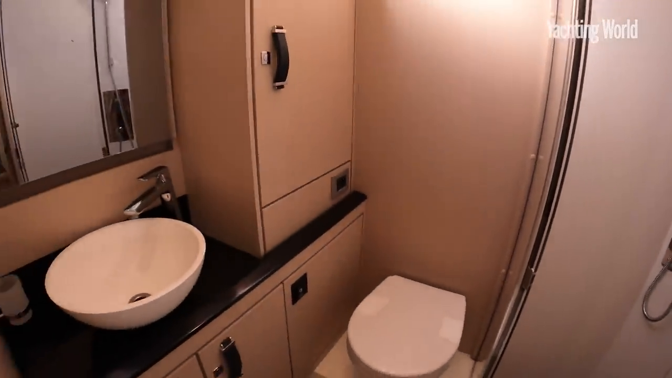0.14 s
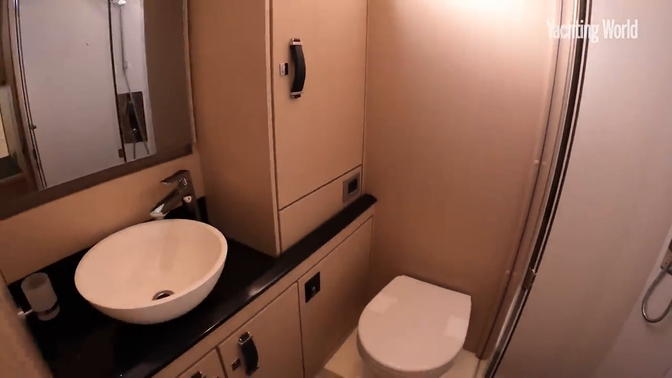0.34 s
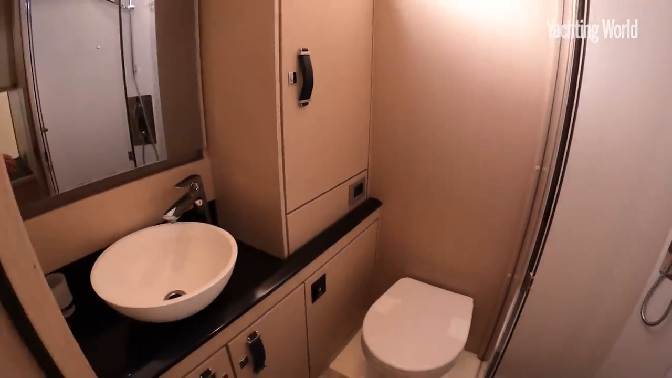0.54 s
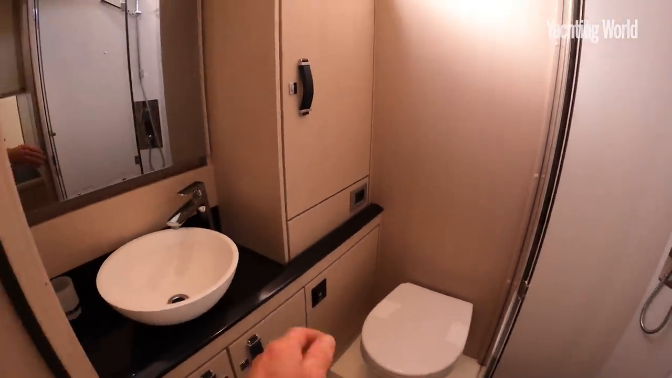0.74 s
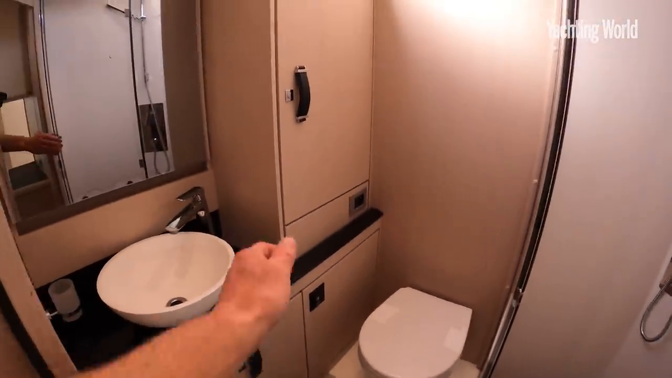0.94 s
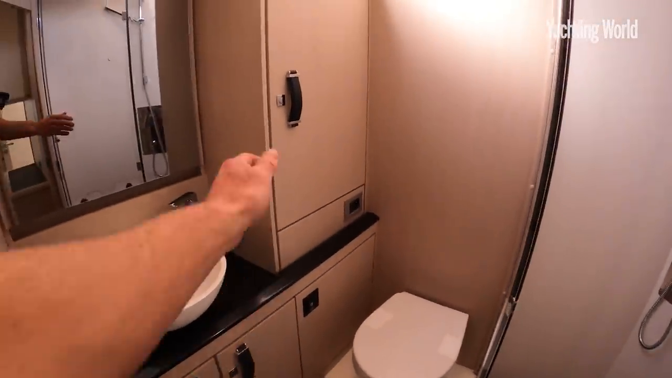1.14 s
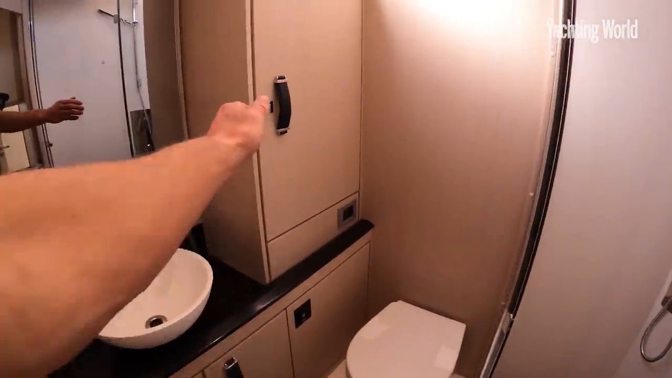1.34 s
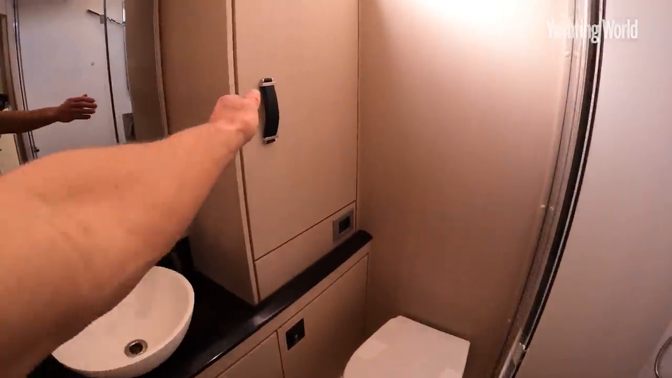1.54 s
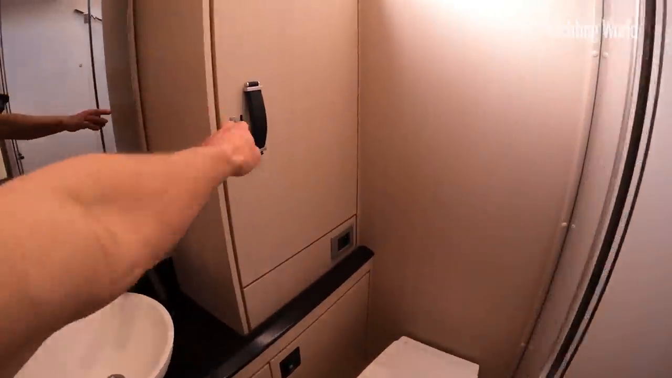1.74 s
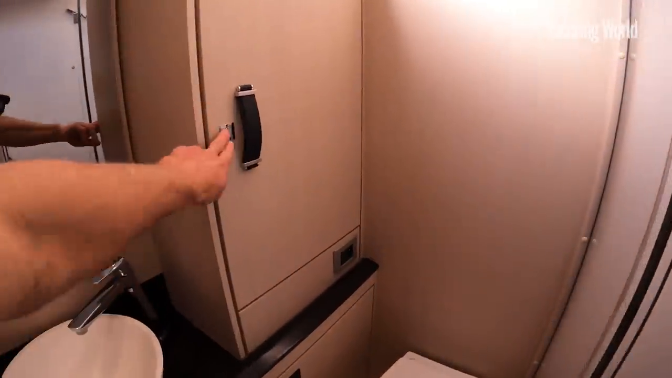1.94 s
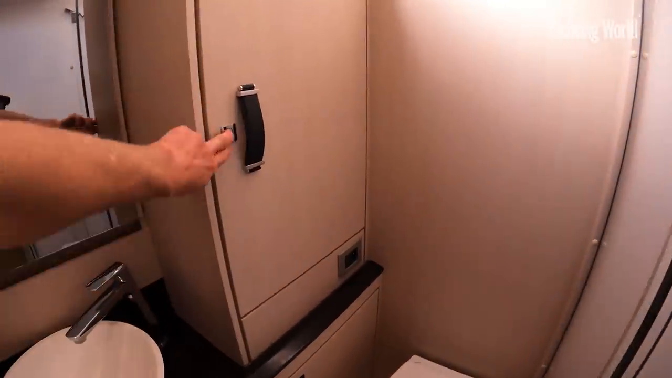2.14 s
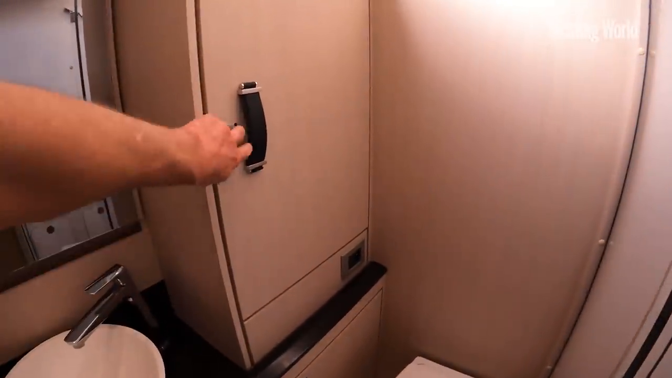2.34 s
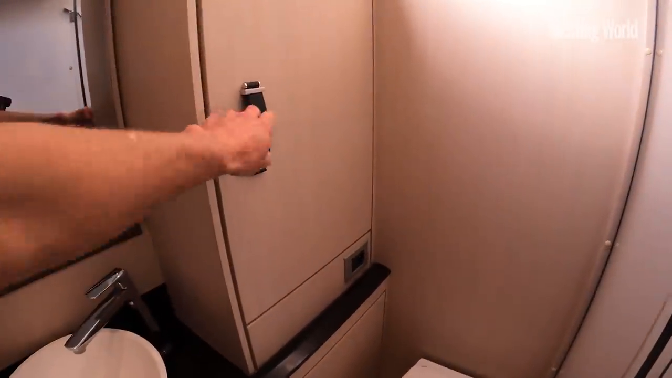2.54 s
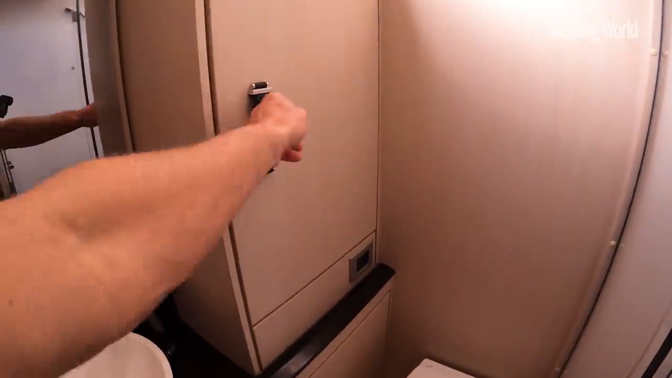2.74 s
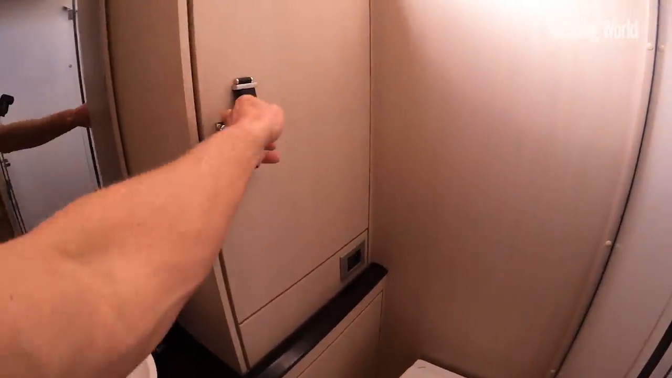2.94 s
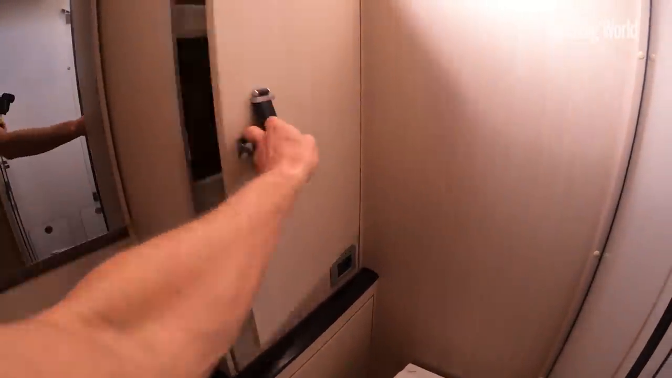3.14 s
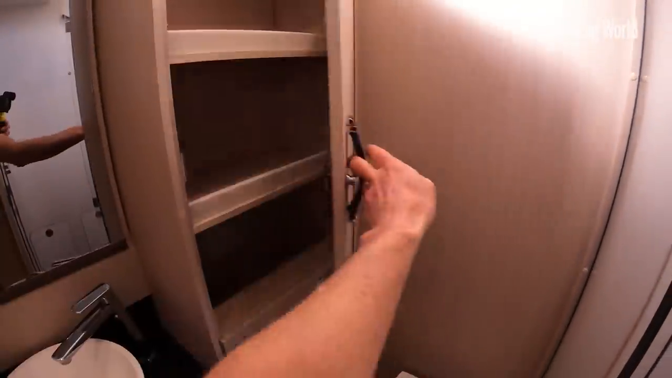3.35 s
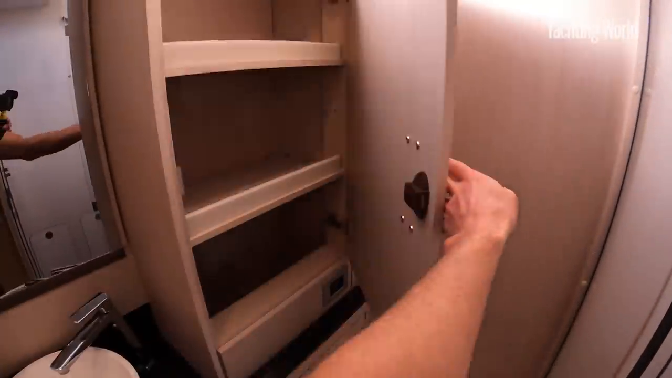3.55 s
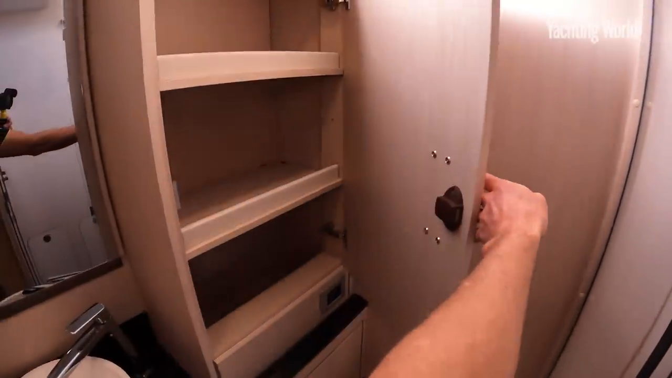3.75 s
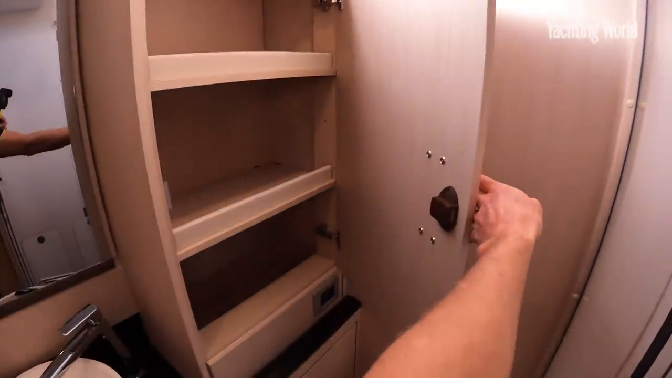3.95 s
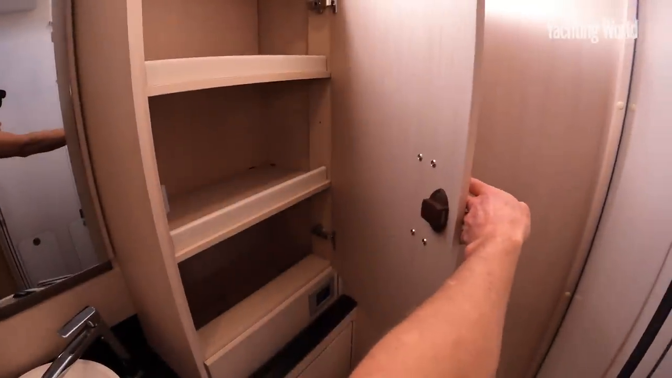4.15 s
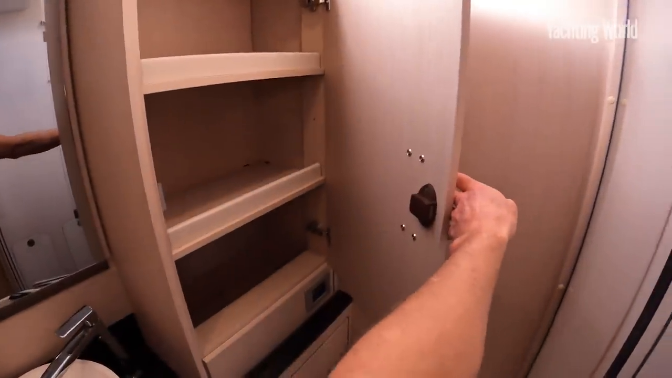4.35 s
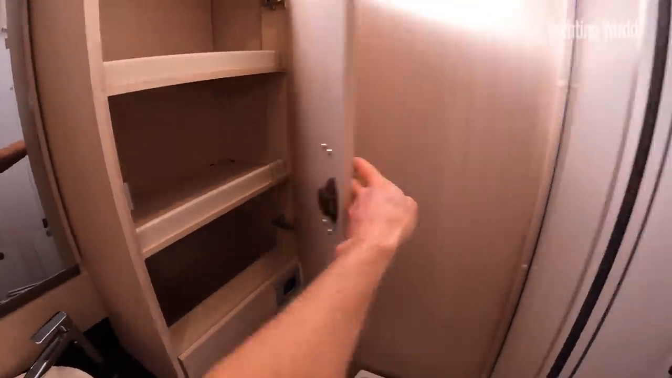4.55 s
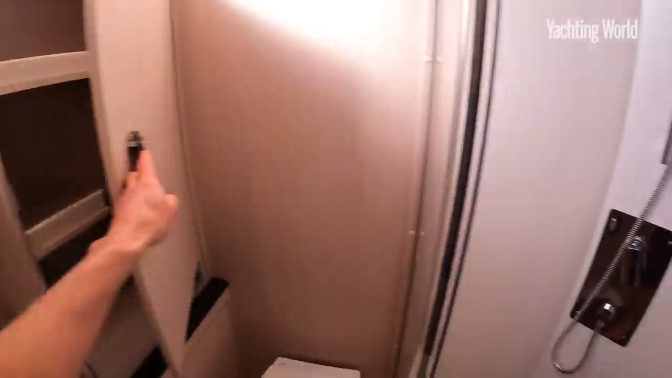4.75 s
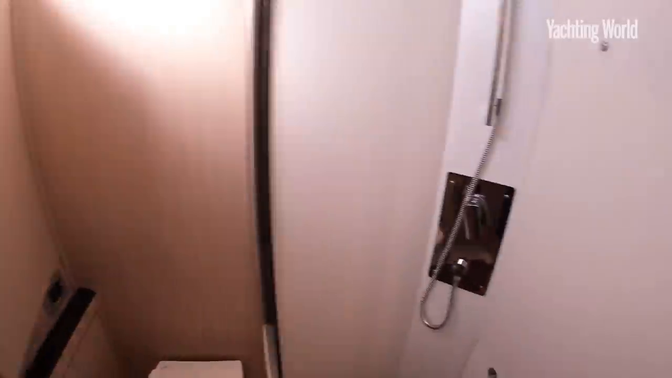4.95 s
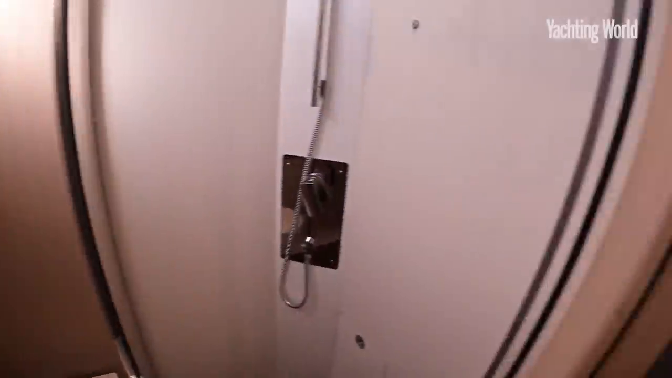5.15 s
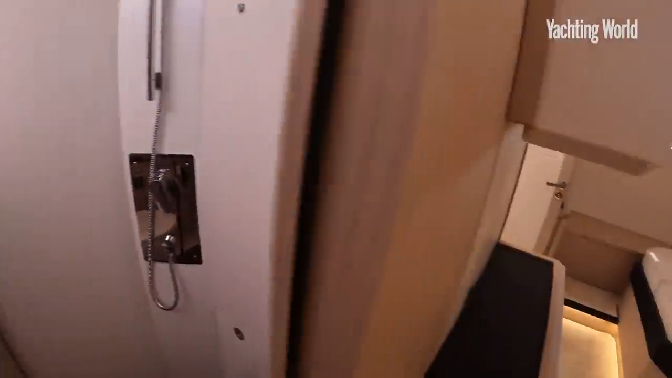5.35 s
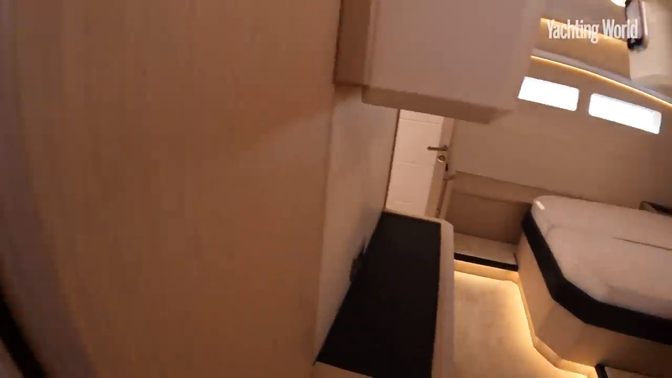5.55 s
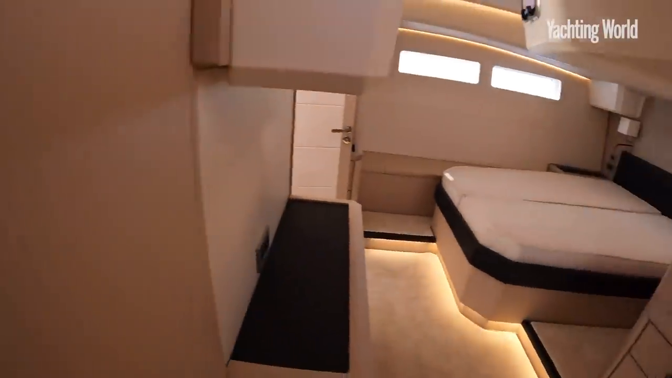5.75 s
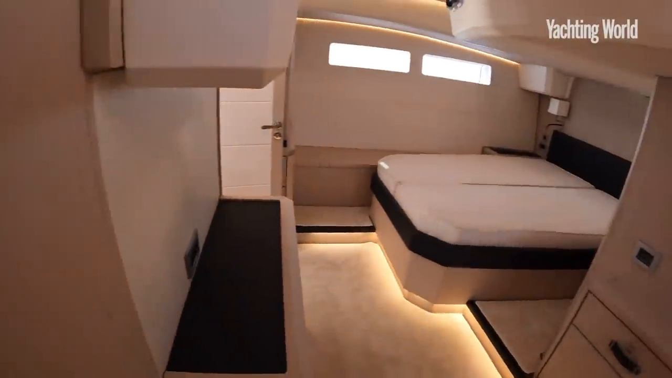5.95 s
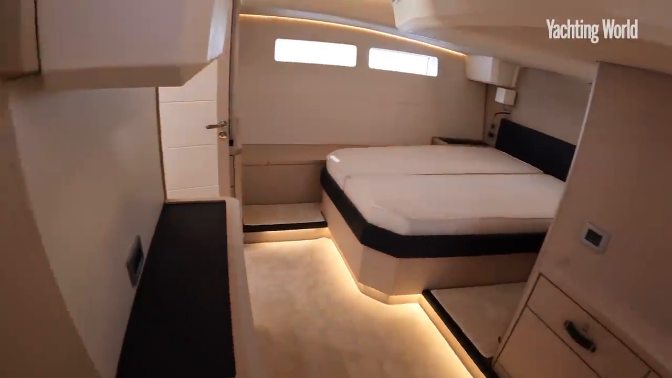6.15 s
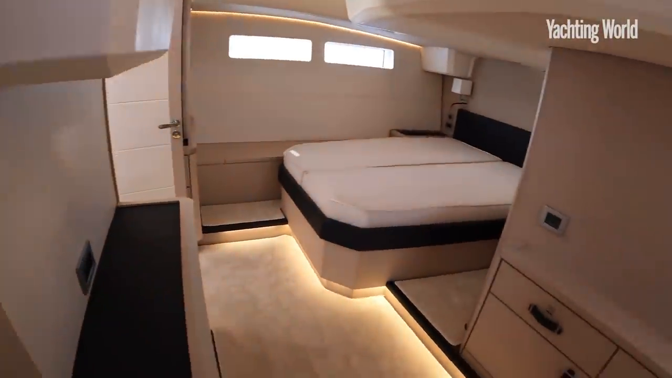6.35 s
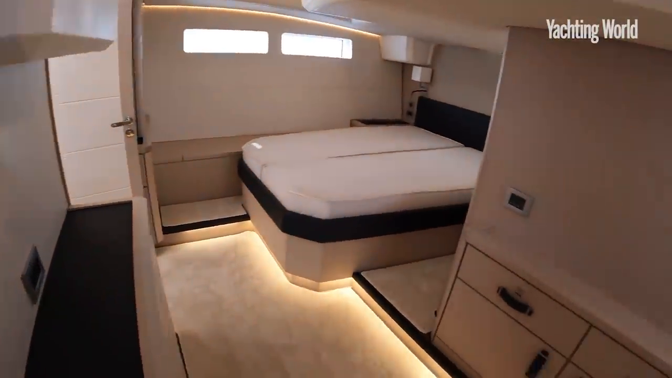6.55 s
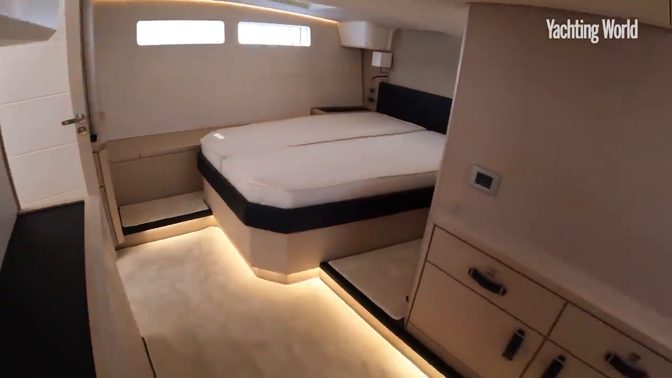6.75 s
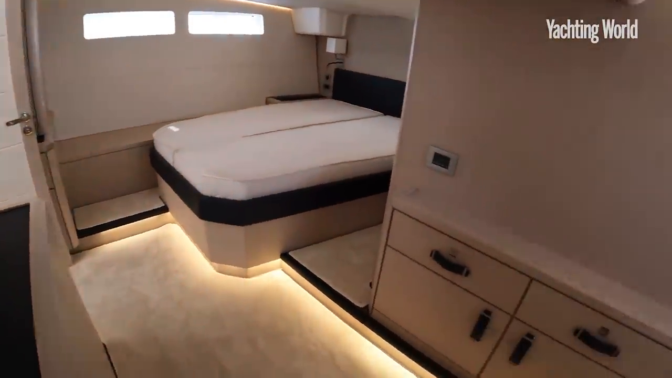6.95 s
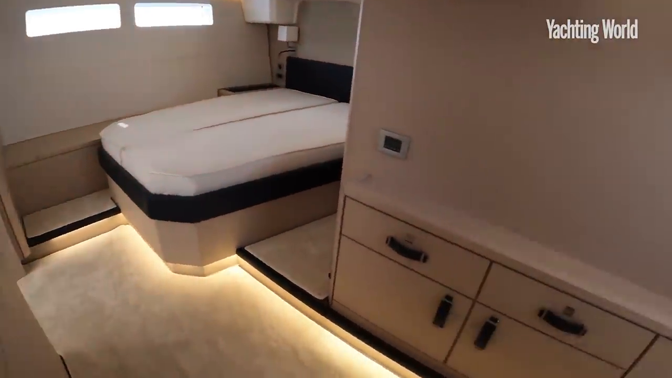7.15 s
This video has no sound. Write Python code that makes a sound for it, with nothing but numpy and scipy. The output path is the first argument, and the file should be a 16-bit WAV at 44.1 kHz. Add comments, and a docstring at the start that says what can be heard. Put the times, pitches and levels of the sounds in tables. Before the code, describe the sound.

A wooden cupboard catch clicks and rattles, then the door opens and bangs shut, over low hum and rustling in a small boat cabin.

```python
"""A low hum, rustle and rumble fill a small boat cabin and swell as someone moves about.
A hand works the push catch of a wooden cupboard, opens the door and lets it slam.
Each blow is a bright snap and a duller clack, both bursts of noise that die away in the cabin,
with a ring and boom of the panels, a thump in the hull and a jingle of metal fittings,
all decaying sine modes. The blows linger in the background as short swells."""
import sys
import numpy as np
from scipy import signal
from scipy.fft import rfft, irfft
from scipy.io import wavfile

SR = 44100
rng = np.random.default_rng(int(sys.argv[2]) if len(sys.argv) > 2 else 0)


def master(y):
    """Save y as 16-bit WAV."""
    cut = np.clip(np.atleast_2d(y).T, -1, 1)
    pcm = np.round(cut * 32767)  # scale
    wavfile.write(sys.argv[1], SR, pcm.astype(np.int16))


N = 321930

# background faders as someone moves about: t/s, rustle/dB, hum/dB, drone/dB, rumble/dB
MOVEMENT = [(0, -58.5, -49.5, -68, -90), (.45, -55, -54, -58, -82), (.72, -60.5, -53, -57, -62),
            (.9, -55.5, -63, -71, -90), (1.15, -57, -58, -70, -92), (1.46, -60, -48.5, -69, -94),
            (1.92, -59.5, -51.5, -69, -84), (2.42, -79, -58, -65, -77), (2.9, -54, -54.5, -72, -67.5),
            (3.5, -52, -52, -65.5, -73.5), (3.92, -62, -64.5, -79, -88.5), (4.12, -65, -53, -75, -94.5),
            (4.5, -64, -72, -81.5, -78), (4.76, -58, -58.5, -62, -68), (5.04, -47.5, -53.5, -64, -75.5),
            (5.4, -63.5, -54, -67, -70), (5.7, -61, -70, -67, -80), (6.02, -61, -74.5, -75, -87.5),
            (6.55, -50.5, -49, -61, -51), (6.69, -48, -55, -66, -60), (6.95, -55.5, -55.5, -55, -54.5),
            (7.3, -64, -73, -78.5, -73.5)]
# swell a blow leaves in rustle, hum, drone and rumble, a row each: level/dB re the blow, t60/s
AFTER_SWELLS = [(-11, 0.25), (-21.5, 0.39), (-8.5, 0.5), (-19.5, 0.53)]
# noise colours of the background layers: f/Hz, relative level/dB
RUSTLE_SPECTRUM = [(180, -27), (300, -6.5), (335, -14), (381, -12), (492, -16.5), (577, -15), (916, -20.5),
                   (1600, -21), (5460, -33), (7160, -40), (9090, -55.5), (11900, -46), (13500, -65)]
HUM_SPECTRUM = [(170, -29), (215, -7), (245, -8.5), (265, -2.5), (290, -4.5), (320, -8.5), (345, -15.5),
                (400, -16.5), (500, -20), (620, -22.5), (800, -43.5)]
DRONE_SPECTRUM = [(100, -33), (130, -6), (160, -3.5), (190, 0.5), (230, -29)]
RUMBLE_SPECTRUM = [(15, -17.5), (40, -7.5), (70, -5.5), (110, -8), (150, -21)]
# cue list of catch and door blows: t/s, snap/dB, clack/dB, ring/Hz, ring/dB, boom/Hz, boom/dB,
# thump/Hz, thump/dB, factor on the wood's t60, snap tilt/(dB per octave), rise/ms
BLOW_CUES = [(0.171, -59.5, -57, 596, -48, 197.5, -34, 175, -67, 1.2, -7.5, 1.8),
             (0.257, -64, -62, 497, -56, 199, -41, 164, -51, .46, 2, 1.1),
             (0.325, -77, -75, 370, -59, 197, -40, 120, -56, .6, -8, 1.2),
             (0.355, -61, -74, 375, -50, 190, -36.5, 167, -69, 0.63, -10.5, 1.3),
             (0.569, -67.5, -70, 371, -60, 211, -45.5, 116, -42.5, 1.1, 5.5, 1.2),
             (0.773, -51, -48.5, 606, -46, 267.5, -36.5, 165, -38.5, 0.68, -2.2, 2.3),
             (1.046, -65, -59, 590, -37, 248, -41, 144, -57, 0.38, 7.5, 1.3),
             (1.515, -49.5, -47, 570, -41, 252.6, -33, 154, -41.5, 0.87, 2.5, 2.5),
             (1.589, -25, -23, 627, -30.5, 240, -30, 64, -40.5, 2.5, 0, 1.7),
             (1.933, -52, -65, 476, -43, 254, -52, 119, -55, .95, 5, 10),
             (1.95, -33.5, -37.5, 870, -30, 265, -45, 116, -53, 0.65, -0.5, 0.92),
             (1.974, -25, -26.5, 469, -21, 251, -19, 110, -29, 1.25, -4, 0.89),
             (2.154, -44.5, -53, 476, -42.5, 275, -33, 115, -54, 3.5, -5.5, 1.2),
             (2.19, -41, -43.5, 907, -35.5, 283, -42, 129, -49, 2.1, -1.5, 5.4),
             (2.205, -32.5, -47, 397, -39, 282, -33.5, 129, -45, 1.4, -1, 3.9),
             (2.222, -31.5, -47, 475, -39, 285, -38, 129, -48, 1.1, -1.5, 0.65),
             (2.33, -38, -45.5, 371, -57, 291, -53, 172, -65, 0.51, 3, 1.7),
             (2.431, -50.5, -67, 612, -21, 256, -52, 145, -47, 0.24, 4.5, 1.3),
             (2.459, -32.5, -52, 810, -41, 250, -57, 112, -47, 1.7, 2.5, 4.5),
             (2.485, -21, -44, 810, -17, 244.7, -25, 106.3, -52, 1.64, 1.5, 1.6),
             (2.499, -19.5, -41, 472, -18, 254, -25, 109, -31.5, 1.1, 3.5, 1.6),
             (2.514, -17.5, -23, 395, -20, 330, -28.5, 109.8, -33.5, 1.1, -2.7, 1.2),
             (2.56, -32, -33.5, 428, -20, 294, -28.5, 106, -43, 0.83, -2.5, .9),
             (2.679, -53, -48, 382, -61, 254, -41.5, 99, -55, 0.56, 6.5, 1.1),
             (2.961, -33, -43.5, 490, -64, 251, -38.5, 112, -43, 0.9, -4.5, 1.2),
             (2.993, -32, -36, 487, -41, 261, -39, 110, -37, 0.81, 1.6, 1),
             (3.059, -24.5, -30, 605, -25.5, 273, -42.5, 166, -42.5, 0.85, 1.4, 0.75),
             (3.202, -25.5, -43, 870, -27.5, 283, -27, 171, -55, 2.9, -0.5, 4.3),
             (3.215, -19.5, -23, 465, -12.5, 207, -23.5, 174, -61.5, 0.83, 2, 0.3),
             (3.235, -50, -28, 390, -26.5, 254, -31, 163, -44.5, 1.2, -7.5, 3),
             (3.321, -40, -39.5, 490, -41.5, 205.5, -34, 173, -51.5, 2.3, 1, .8),
             (3.484, -47.5, -50.5, 416, -54, 249, -46, 127, -60.5, 3.6, 1.7, 1.8),
             (3.634, -60, -77, 423, -74, 254, -52.5, 178, -69.5, 1.5, 4, 1.3),
             (3.841, -71, -64, 625, -37.5, 264, -62, 160.5, -66.5, 0.17, 5, 0.82),
             (4.264, -84, -56.5, 563, -39, 264, -53, 175.6, -69, 0.6, -2.1, 3.5),
             (4.3, -82, -55.5, 584, -38.5, 277, -45, 168.5, -78, 0.88, -6, 1.2),
             (4.843, -49, -62, 476, -53.5, 294, -54.5, 156, -55.5, 2, -1, 2),
             (4.886, -44, -48, 870, -43, 273, -38.5, 126, -52, .95, -1.5, 2.3),
             (4.94, -62.5, -67, 353, -47.5, 207, -41.5, 153, -61, .93, 5, 1.3),
             (5.062, -31, -23.5, 615, -13.5, 277.3, 0, 160, -24.5, 0.79, 2.5, 2.4),
             (5.09, -38, -32, 533, -7.5, 207, -13.5, 102, -27, 0.68, -4.5, 0.9),
             (5.118, -48.5, -41.5, 512, -10.5, 337, -27, 163, -30, 0.42, 3, 3),
             (5.297, -70.5, -80, 364, -61, 215, -55, 86, -53, 1.2, 8, 0.91),
             (5.532, -54.5, -49.5, 522, -61.5, 222, -43, 118, -55.5, 0.83, -7, 1.7),
             (5.704, -57.5, -75, 536, -65.5, 250, -75, 161, -55.5, 1.3, 3, 1.3),
             (6.035, -32, -32, 461, -29, 342.5, -41, 166, -34, 1.9, -5.5, 5.8),
             (6.272, -67.5, -79, 301, -35, 180, -44, 150.4, -29, 1.2, -1, 5.9),
             (6.391, -59, -66, 450, -75, 270, -55, 138, -43, 0.93, 4, 3.4),
             (6.412, -38.5, -48, 450, -53, 272, -64, 163, -58.5, 3.8, -2.5, 9.1),
             (6.621, -40, -46, 484, -45, 260, -38, 127, -46, 0.74, -4, 1.4),
             (6.669, -32, -45, 477, -43, 329, -44.5, 125, -54, 2.7, 0, 25),
             (6.723, -28.5, -40, 890, -25, 333, -51, 126, -67, 1.17, 1.7, 1.9),
             (6.846, -56, -44.5, 355, -41, 262, -30, 149, -37, 0.38, 8, 1.3),
             (6.898, -27.5, -33, 485, -42.5, 317, -46, 110, -47, 3.6, 2.5, 4.9)]
(BLOW_S, SNAP_DB, CLACK_DB, RING_HZ, RING_DB, BOOM_HZ, BOOM_DB,
 THUMP_HZ, THUMP_DB, WOOD_STRETCH, TILT_DB, RISE_MS) = np.transpose(BLOW_CUES)
# noise colours of a blow: f/Hz, relative level/dB
SNAP_SPECTRUM = [(710, -39.5), (1200, -15), (1520, -1), (1660, -6.5), (1800, 2), (2030, 0.5), (2620, 2),
                 (2840, -2.5), (3440, -3), (4760, -11.5), (6860, -21), (9030, -40), (12100, -39),
                 (13500, -60)]
CLACK_SPECTRUM = [(150, -23), (400, -2.5), (700, -3), (1200, -4.5), (1800, -18.5), (3000, -39)]
# cabin reverb by band: f/Hz, base t60/s
CABIN_DECAY = [(600, 0.28), (2000, 0.25), (5000, 0.27), (11000, 0.29)]
# modes of panels and carcass: f/Hz, relative level/dB, base t60/s
WOOD_MODES = [(36, -4, .5), (56.8, 5, 0.81), (86, 3.5, 0.8), (110, 1.5, 0.62), (129, 5, 0.28),
              (145, 7, 0.39), (163, -9, 0.3), (188, 2, 0.46), (207, 2.5, 0.59), (230, -3.5, 0.74),
              (254, 4, 0.55), (271.5, 0, 0.32), (298.7, 4, 0.33), (337, 3.5, 1), (390, 5.5, 0.28),
              (425, 2, 0.36), (476, 2, .3), (517, 3, 0.19), (618, 3, 0.11), (682, -0.5, 0.28),
              (820, -6, 0.27), (870, 0.5, 0.21), (955.5, -4, 0.17)]
# modes of catch and handle: f/Hz, relative level/dB, base t60/s
METAL_MODES = [(1304, -6.5, 0.16), (1674, -3.5, 0.12), (2040, -6, 0.32), (2155, -2.5, 0.073),
               (2310, -6, 0.17), (2520, -9.5, 0.11), (2630, -10, 0.14), (3010, -6, .2), (3280, -7.5, .15),
               (3740, -5, 0.05), (3970, -3, 0.023), (5050, -12.5, 0.049), (5980, -17.5, .12),
               (6900, -19, 0.14)]

TILT_PIVOT_HZ, TOP_HZ = 2000, 13800
SWELL_RISE_S, CRACK_T60_S = 0.011, 0.0064


def gain_of(db):
    """Decibels to amplitude."""
    return 10 ** (np.asarray(db) / 20)


def noise(spectrum, share=lambda hz: 1):
    """Coloured noise of rms 1, before share picks out a band of it."""
    hz = np.fft.rfftfreq(N, 1 / SR)
    points_hz, points_db = np.transpose(spectrum)
    shape = gain_of(np.interp(np.log(hz + 1), np.log(points_hz + 1), points_db, left=-90, right=-90))
    return irfft(rfft(rng.standard_normal(N)) * shape * share(hz), N) / np.sqrt(np.mean(shape ** 2))


def wander(depth_db, rate_hz):
    """A gain that drifts between random levels."""
    points = rng.standard_normal(int(N / SR * rate_hz) + 2)
    return gain_of(depth_db * np.interp(np.linspace(0, len(points) - 1, N), np.arange(len(points)), points))


def fader(layer, blow_db):
    """Gain of a background layer: the movement, plus a swell after each blow."""
    cue_s, *levels_db = np.transpose(MOVEMENT)
    moving = gain_of(np.interp(np.arange(N) / SR, cue_s, levels_db[layer]))
    send_db, t60 = AFTER_SWELLS[layer]
    kicks = np.zeros(N)
    kicks[np.round(BLOW_S * SR).astype(int)] = gain_of(blow_db + send_db) ** 2
    tails = signal.lfilter([1], [1, -gain_of(-60 / (t60 * SR)) ** 2], kicks)
    pole = np.exp(-1 / (SWELL_RISE_S * SR))
    swell_power = signal.lfilter([1 - pole], [1, -pole], tails)
    return np.sqrt(moving ** 2 + swell_power)


def rustle():
    """Cloth and feet: fluttering broad noise in which the snaps linger."""
    return fader(0, SNAP_DB) * wander(depth_db=1, rate_hz=30) * noise(RUSTLE_SPECTRUM)


def panel_hum():
    """The panels hum and drone in uneven swells; booms linger in the hum, thumps in the drone."""
    hum = fader(1, BOOM_DB) * wander(depth_db=1.5, rate_hz=5.8) * noise(HUM_SPECTRUM)
    drone = fader(2, THUMP_DB) * wander(depth_db=3.1, rate_hz=24) * noise(DRONE_SPECTRUM)
    return hum + drone


def hull_rumble():
    """The hull's slowly heaving low end, lifted by each thump."""
    return fader(3, THUMP_DB) * wander(depth_db=1.5, rate_hz=2) * noise(RUMBLE_SPECTRUM)


def tail_stretch(snap_db):
    """Factor on t60: faint snaps come from further off and hang on longer."""
    return 1.278 + 0.013 * (-19.5 - snap_db)


def cabin_bursts(levels_db, spectrum, tilts_db, crack_db):
    """Blows and their dense echoes: each noise band leaps up and dies at its own, quickening pace."""
    t = np.arange(SR // 3) / SR
    band_hz, t60 = np.transpose(CABIN_DECAY)
    bands = np.arange(len(band_hz))
    power = np.zeros((len(bands), N + SR))
    crack = gain_of(crack_db - 60 * t / CRACK_T60_S) ** 2  # direct sound, before the walls answer
    for i, start_s in enumerate(BLOW_S):
        colour = gain_of(levels_db[i] + tilts_db[i] * np.log2(band_hz[:, None] / TILT_PIVOT_HZ)) ** 2
        tail = gain_of(-60 * t / (t60[:, None] * tail_stretch(SNAP_DB[i])) - 82 * t ** 2) ** 2
        attack = 1 - np.exp(-1000 * t / RISE_MS[i])
        power[:, round(start_s * SR):][:, :len(t)] += colour * (tail + crack) * attack ** 2
    out = np.zeros(N)
    for band in bands:
        crossover = lambda hz: np.sqrt(np.interp(np.log2(hz + 1), np.log2(band_hz), bands == band))
        out += noise(spectrum, crossover) * np.sqrt(power[band, :N])
    return out


def ring(modes, levels_db, stretches, build_cycles, spread_db, choke_db_s2):
    """Struck modes, a little detuned and randomly softened each time; levels_db is blows by modes."""
    out, t = np.zeros(N + SR), np.arange(SR // 3) / SR
    chance = rng.random((len(BLOW_S), len(modes), 2))
    for i, start_s in enumerate(BLOW_S):
        audible = levels_db[i] > -72
        hz, mode_db, t60, tune, size, strike_db = np.c_[modes, chance[i], levels_db[i]][audible].T[..., None]
        attack = 1 - np.exp(-t / (build_cycles / hz + RISE_MS[i] / 1000))  # low modes bloom later
        level_db = strike_db + mode_db - spread_db * (1 - size)
        fade_db = -60 * t / (t60 * stretches[i]) - choke_db_s2 * t ** 2
        detuned_hz = hz * (1 + 0.012 * (tune - .5))
        partials = gain_of(level_db + fade_db) * attack * np.sin(2 * np.pi * detuned_hz * t)
        out[round(start_s * SR):][:len(t)] += partials.sum(0)
    return out[:N]


def panel_knocks():
    """The struck spot sets which wood modes speak: those near its ring, boom and thump pitches."""
    mode_hz = np.transpose(WOOD_MODES)[0]
    power = 0
    for hz, db, db_per_octave in (RING_HZ, RING_DB, 50), (BOOM_HZ, BOOM_DB, 110), (THUMP_HZ, THUMP_DB, 34):
        octaves_off = abs(np.log2(mode_hz / hz[:, None]))
        power += gain_of(db[:, None] - db_per_octave * octaves_off) ** 2
    levels_db = 10 * np.log10(power)
    return ring(WOOD_MODES, levels_db, WOOD_STRETCH, build_cycles=.9, spread_db=1.5, choke_db_s2=302)


def fittings_jingle():
    """Catch and handle ring with the snaps and follow their level and brightness."""
    octaves = np.log2(np.transpose(METAL_MODES)[0] / TILT_PIVOT_HZ)
    levels_db = SNAP_DB[:, None] + TILT_DB[:, None] * octaves
    stretches = tail_stretch(SNAP_DB)
    return ring(METAL_MODES, levels_db, stretches, build_cycles=.6, spread_db=16, choke_db_s2=500)


def scene():
    """Mono mix of the blows over the background bed."""
    snaps = cabin_bursts(SNAP_DB, SNAP_SPECTRUM, TILT_DB, crack_db=7)
    clacks = cabin_bursts(CLACK_DB, CLACK_SPECTRUM, np.zeros_like(TILT_DB), crack_db=-3.5)
    blows = snaps + clacks + panel_knocks() + fittings_jingle()
    bed = rustle() + panel_hum() + hull_rumble()
    return (blows + bed)[None]


def record(dry):
    """A steep low-pass trims the top end."""
    lowpass = signal.firwin(511, TOP_HZ, window=("kaiser", 9), fs=SR)
    return signal.oaconvolve(dry, lowpass[None], "same")


dry = scene()
out = record(dry)
master(out)
```